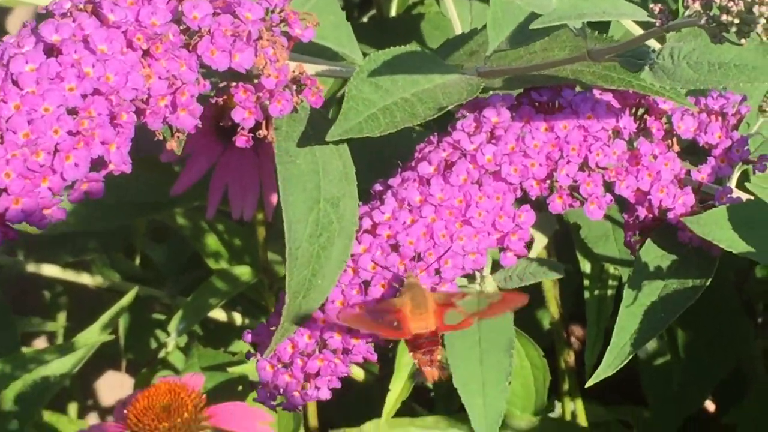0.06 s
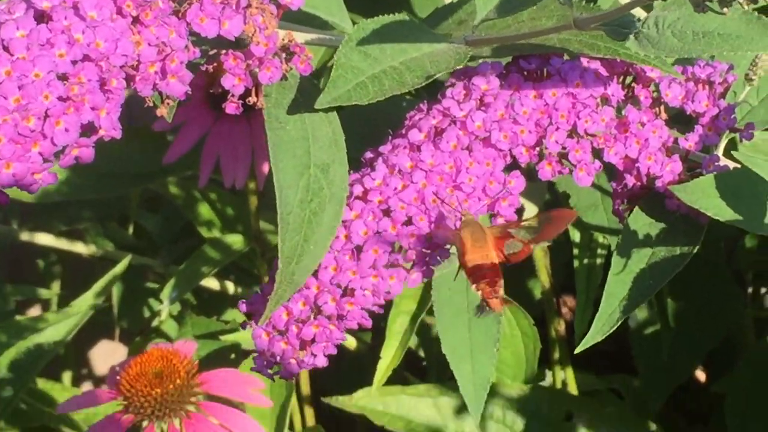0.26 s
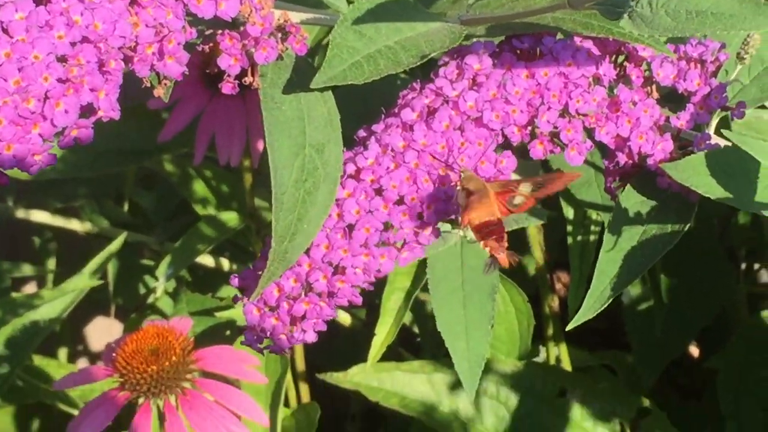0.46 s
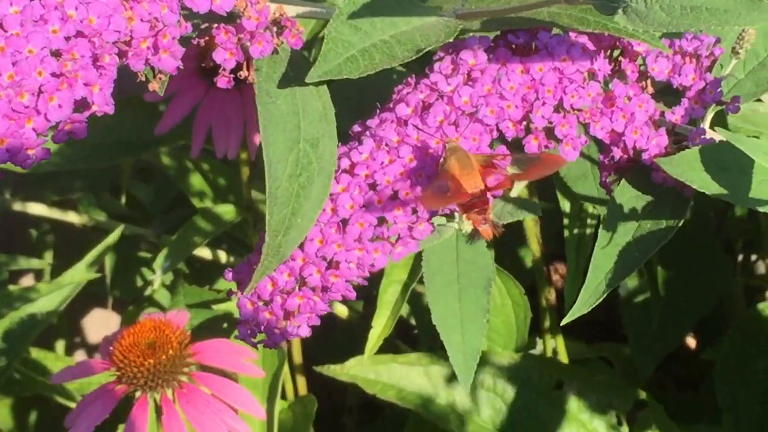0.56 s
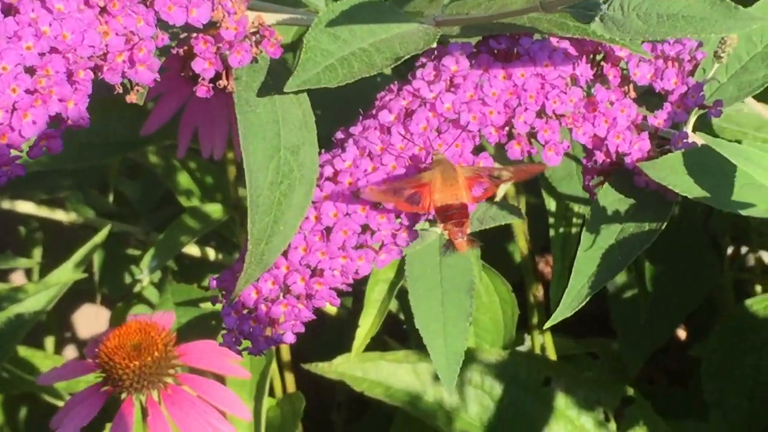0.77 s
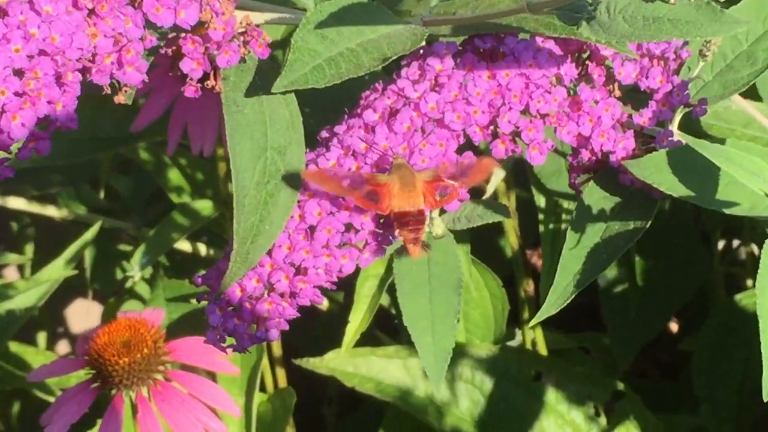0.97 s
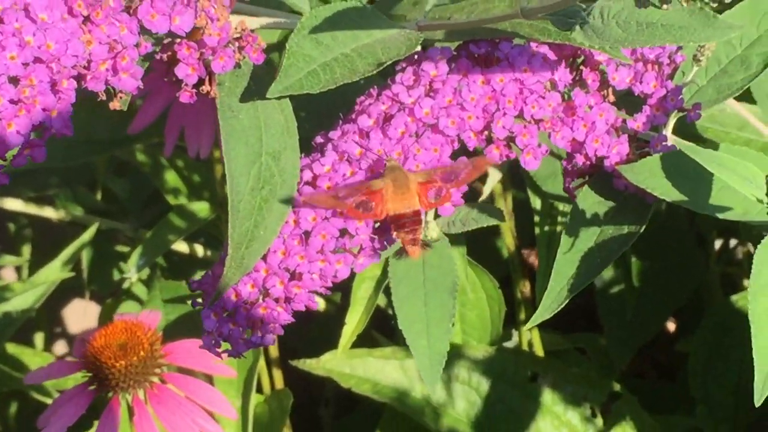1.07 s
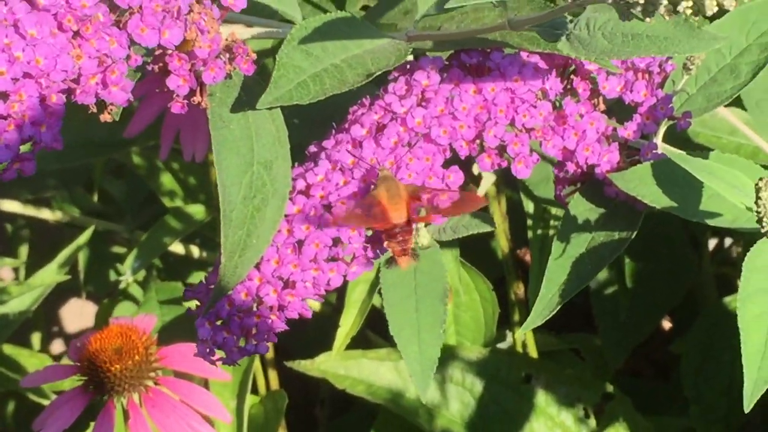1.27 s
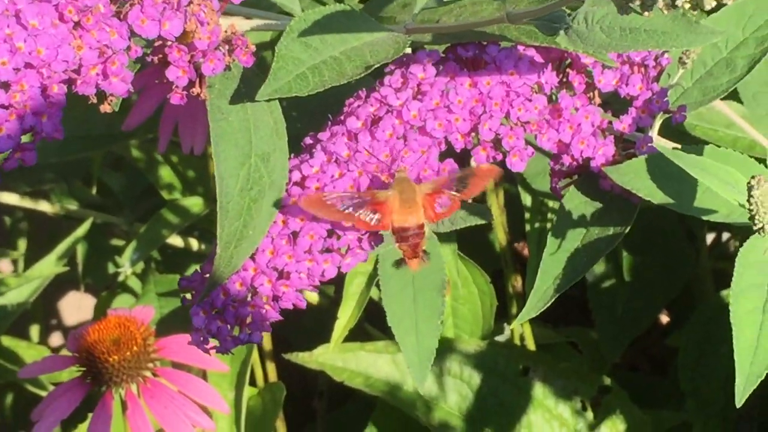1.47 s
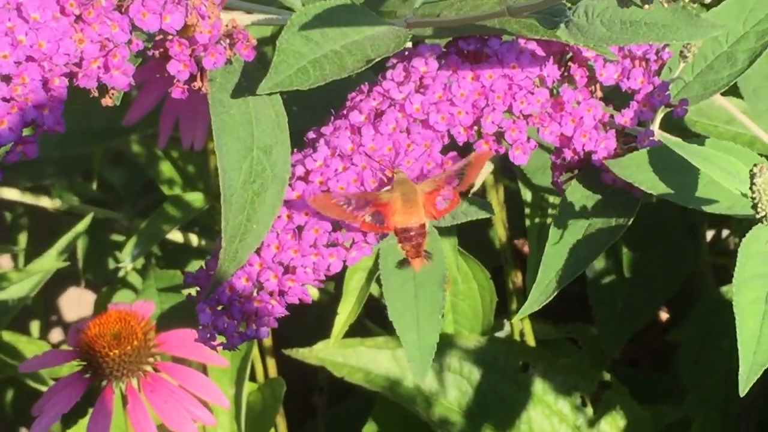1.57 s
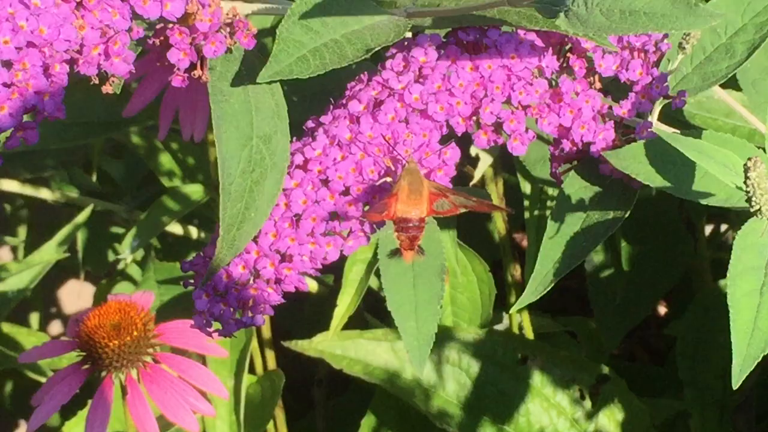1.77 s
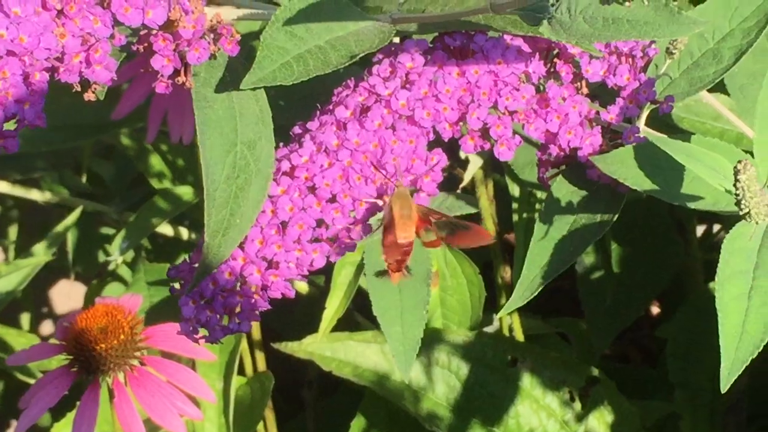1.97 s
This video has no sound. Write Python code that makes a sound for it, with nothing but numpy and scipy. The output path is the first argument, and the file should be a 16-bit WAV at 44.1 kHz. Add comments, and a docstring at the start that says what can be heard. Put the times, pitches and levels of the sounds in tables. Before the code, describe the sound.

A faint cricket trills in a garden, with low handling bumps close to the microphone.

```python
"""A garden, heard through the microphone of a hand-held camera.
A small cricket trills, about twelve wing strokes a second, each an arched tone scattered by the leaves.
Right at the microphone, fingers shift on the case: a little rubbing, brief scuffs, soft bumps and
two sharp knocks. A low rumble and a steady, distant hiss lie behind it all."""
import sys
import numpy as np
from scipy import signal
from scipy.fft import rfft, irfft
from scipy.io import wavfile
from scipy.ndimage import uniform_filter1d

SR = 44100
rng = np.random.default_rng(int(sys.argv[2]) if len(sys.argv) > 2 else 0)


def int16_out(signal):
    """Quantize to a 16-bit WAV file."""
    q = np.round(np.clip(np.atleast_2d(signal).T, -1, 1) * 32767)
    wavfile.write(sys.argv[1], SR, q.astype(np.int16))


N = 88200


def undb(db):
    """Decibels to gain."""
    return 10 ** (np.asarray(db) / 20)


def noise(colour):
    """Noise of unit rms with a spectrum of (Hz, dB) points, falling away outside them."""
    hz, db = np.array(colour, float).T
    f = np.maximum(np.arange(N // 2 + 1) * SR / N, 1)
    gain = undb(np.interp(np.log(f), np.log(hz), db))
    skirts = np.minimum(f / hz[0], 1) ** 3 * np.minimum(hz[-1] / f, 1) ** 6
    shaped = irfft(rfft(rng.standard_normal(N)) * gain * skirts, N)
    return shaped / shaped.std()


def add(out, start_s, sound):
    """Mix a sound in at a time."""
    i = max(int(start_s * SR), 0)
    out[i:i + len(sound)] += sound[:max(N - i, 0)]


def mode(t, hz, db, rise_s, t60):
    """One resonance that builds up smoothly and dies away."""
    envelope = (1 - np.exp(-(t / rise_s) ** 2)) * np.exp(-np.log(1000) * t / t60)
    return undb(db) * envelope * np.sin(2 * np.pi * hz * t)


# The garden's bed of rumble and far-off hiss. Each row: frequency in Hz, relative level in dB.
RUMBLE_SPECTRUM = [(25, -22), (35, -17), (55, 13), (90, -4.5), (145, 0), (200, -11.5), (300, -13.5),
                   (450, -14.5), (600, -41.5)]
HISS_SPECTRUM = [(150, -1), (450, -6), (700, -1), (1300, -4), (2050, -3), (2350, -8), (2480, -2.5),
                 (2580, -1), (2800, -8), (4400, -10.5), (4950, -13), (5500, -11), (6600, -11.5),
                 (7600, -14.5), (9500, -17), (10400, -21.5), (11700, -17.5), (14300, -18.5), (15700, -22)]
def garden_air():
    """A low rumble of air and an even, distant hiss."""
    return undb(-67) * noise(RUMBLE_SPECTRUM) + undb(-72) * noise(HISS_SPECTRUM)


# The grip rubbing, right at the microphone. Each row: time in seconds, level in dB.
RUB_LEVELS = [(0, -64), (.06, -53), (.12, -60), (.17, -85), (.21, -62.5), (.29, -45.5), (0.339, -52),
              (0.409, -69), (0.528, -53.5), (.6, -77.5), (2, -98)]
# Its low body and its high hiss. Each row: frequency in Hz, relative level in dB.
RUB_SPECTRUM = [(30, -3), (70, 5), (150, -2), (270, -20.5), (480, -17.5), (750, -32.5), (1500, -39.5),
                (4000, -43.5)]
SKIN_SPECTRUM = [(7000, 4), (11000, -5), (14000, 6), (15700, -4)]
def grip_rub(hiss_end_s=.62, hiss_fade_s=.06):
    """Skin rubs on the case, low with a faint high hiss, until the hand settles."""
    t = np.arange(N) / SR
    times, db = np.array(RUB_LEVELS).T
    hiss = undb(-86.5) * noise(SKIN_SPECTRUM) * np.clip((hiss_end_s - t) / hiss_fade_s, 0, 1)
    rub = noise(RUB_SPECTRUM) * undb(np.interp(t, times, db))
    return rub + hiss


# The cricket out among the leaves, faint at the microphone.
# Each row: start in seconds, level in dB before the trim, pitch at the crest in Hz.
WING_STROKES = [(.021, -76, 6030), (.1, -82, 6000), (.177, -74, 6060), (.256, -69.5, 6100),
                (.339, -71.5, 6220), (.421, -77, 6160), (.502, -73, 6220), (.580, -72.5, 6240),
                (.663, -73.5, 6160), (.743, -72, 6270), (.823, -75, 6160), (.902, -71.5, 6260),
                (.982, -68.5, 6430), (1.065, -69, 6310), (1.147, -70.5, 6320), (1.230, -73, 6300),
                (1.312, -74, 6260), (1.394, -71.5, 6380), (1.474, -74.5, 6240), (1.554, -70, 6220),
                (1.632, -72.5, 6370), (1.714, -68.5, 6380), (1.795, -72.5, 6330), (1.875, -74, 6500),
                (1.953, -73.5, 6400)]
def cricket(trim_db=-0.5):
    """Each wing stroke is an arched, slightly rasping tone; echoes from nearby leaves make it flutter."""
    stroke_s, attack_s, release_s = 0.038, 0.013, 0.028
    crest_s, climb_hz, end_hz = .013, 130, 5680
    waver_hz, rasp_depth = 35, .17
    echo_db, echo_decay_s = -2, .004
    out, t = np.zeros(N), np.arange(int(stroke_s * SR)) / SR
    # The pitch climbs to a crest, then sags as the wings slow.
    below_crest_hz = climb_hz * np.maximum(1 - t / crest_s, 0) ** 2
    sag = (np.maximum(t - crest_s, 0) / (stroke_s - crest_s)) ** 2
    swell = np.clip(t / attack_s, 0, 1) * np.clip((stroke_s - t) / release_s, 0, 1)
    lag = np.arange(SR // 10) / SR
    for start, db, hz in WING_STROKES:
        jitter = rng.standard_normal((2, len(lag)))
        waver, rasp = uniform_filter1d(jitter, size=70)[:, :len(t)]
        pitch = hz - below_crest_hz - (hz - end_hz) * sag + waver_hz * waver / waver.std()
        tone = swell * (1 + rasp_depth * rasp / rasp.std()) * np.sin(2 * np.pi * np.cumsum(pitch) / SR)
        leaf_scatter = rng.standard_normal(len(lag)) * np.exp(-lag / echo_decay_s)
        heard = signal.fftconvolve(tone, leaf_scatter)
        heard *= undb(echo_db) * np.linalg.norm(tone) / np.linalg.norm(heard)
        heard[:len(t)] += tone  # the direct sound joins its echoes
        heard *= np.sqrt(len(t) / 2) / np.linalg.norm(heard)  # energy of a unit sine one stroke long
        add(out, start, undb(db + trim_db) * heard)
    return out


# Skin and sleeve slipping, close to the microphone.
# Each row: start in seconds, length in seconds, level in dB, centre frequency in Hz.
SLIPS = [(0.049, 0.014, -68, 416), (0.068, 0.02, -67, 330), (0.185, 0.0286, -68, 376),
         (0.268, 0.0083, -55.5, 440), (.283, .014, -49.5, 334), (.284, 0.011, -65, 900),
         (0.316, 0.015, -63, 465), (0.437, 0.017, -64.5, 443), (0.248, 0.088, -81, 3150),
         (0.536, 0.032, -78.5, 3230)]
def scuffs(edge_ratio=0.96):
    """Brief slips: bursts of friction noise that swell quickly and fade."""
    out = np.zeros(N)
    for start, length, db, hz in SLIPS:
        progress = np.linspace(0, 1, int(length * SR))
        band = noise([(hz / edge_ratio, 0), (hz * edge_ratio, 0)])[:len(progress)]
        friction = band * progress * (1 - progress) ** 2
        add(out, start, undb(db) * friction / friction.std())
    return out


# Fingers landing on the camera, right at the microphone. Each row: start in seconds, level in dB,
# pitch halfway down the thump's fall in Hz, hardness in dB (the gain of ring and tick).
FINGER_CONTACTS = [(0.0569, -46, 128, -4), (0.077, -46, 98, -20), (.093, -45, 70, -28),
                   (0.113, -64, 98, -30), (.14, -51.5, 106, -20), (0.1818, -47.5, 124, -7),
                   (.194, -37, 78, -18), (0.24, -51, 123, -31), (0.27, -54, 127, -10),
                   (0.2818, -31, 91.6, -27), (0.3257, -31.5, 106, 6.5), (0.48, -27.5, 103.7, 6.5),
                   (.512, -44.5, 57, -15), (.545, -52, 55.7, -31), (.66, -52, 63.3, -40),
                   (.712, -56, 72.6, -35), (0.995, -46, 59, -39), (1.075, -52, 60, -38),
                   (1.158, -53.5, 60, -35), (1.3748, -58.5, 102, 8), (1.383, -44.5, 81.7, -51),
                   (1.618, -52.5, 64.7, -28.5), (1.819, -55.5, 54.4, -37), (1.935, -55.5, 86.4, -32)]
# The ring of the case. Each row: frequency in Hz, relative level in dB, rise in seconds,
# time to fall 60 dB in seconds before the hand chokes it.
CASE_RESONANCES = [(523.6, 3, 0.0023, 0.054), (623.4, 3, 0.0013, 0.016), (760, -8.5, 0.003, 0.013),
                   (880, -61, 0.003, 0.011)]
# The tick of first touch. Each row: frequency in Hz, relative level in dB, time to fall 60 dB in seconds.
TICK_RESONANCES = [(1320, -0.5, 0.016), (1634, -9.5, 0.036), (2067, 5.5, 0.012), (2311, -4.5, 0.024),
                   (3380, -3, 0.0036), (4110, -16, 0.0061)]
def finger_bumps():
    """Every contact gives a low thump that sags in pitch; harder ones also tick and ring the case."""
    cycles_to_peak, sag_depth, sag_s, choke_s = 0.7, 0.62, 0.016, 0.01
    tick_db, tick_lead_s, tick_rise_s = -28, 0.001205, 0.0003
    out, t = np.zeros(N), np.arange(SR // 10) / SR
    ring = sum(mode(t, *row) for row in CASE_RESONANCES) * np.exp(-(t / choke_s) ** 2)
    tick = sum((-1) ** k * mode(t, hz, db, tick_rise_s, t60)
               for k, (hz, db, t60) in enumerate(TICK_RESONANCES))
    for start, db, hz, hardness_db in FINGER_CONTACTS:
        age = t * hz / cycles_to_peak
        swell = (age * np.exp(1 - age)) ** 2
        pitch = hz * (1 + sag_depth * (2 * np.exp(-t / sag_s) - 1))
        thump = swell * np.sin(2 * np.pi * np.cumsum(pitch) / SR)
        add(out, start, undb(db) * (thump + undb(hardness_db) * ring))
        add(out, start - tick_lead_s, undb(db + hardness_db + tick_db) * tick)
    return out


def scene():
    """The cricket, the close handling noise and the garden air at one microphone."""
    return (cricket() + finger_bumps() + scuffs() + grip_rub() + garden_air())[None]


def record(dry, low_hz=32, top_hz=15700):
    """The camera cuts the deepest bass and the highest treble."""
    low_cut = signal.butter(3, low_hz, "high", fs=SR, output="sos")
    top_cut = signal.ellip(10, .1, 70, top_hz, fs=SR, output="sos")
    return signal.sosfilt(top_cut, signal.sosfilt(low_cut, dry))


dry = scene()
out = record(dry)
int16_out(out)
```